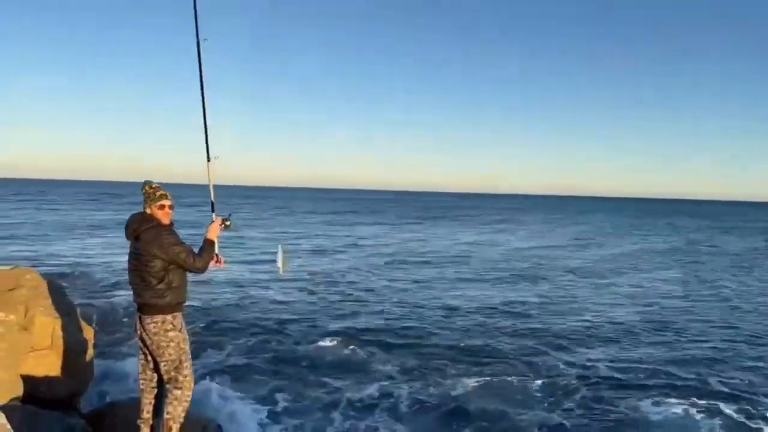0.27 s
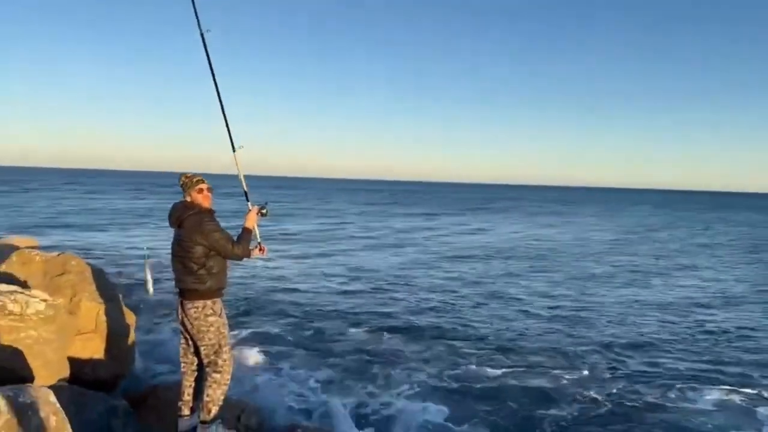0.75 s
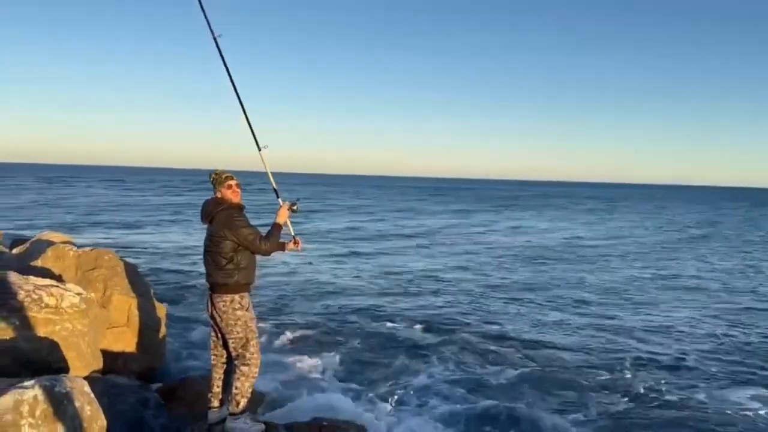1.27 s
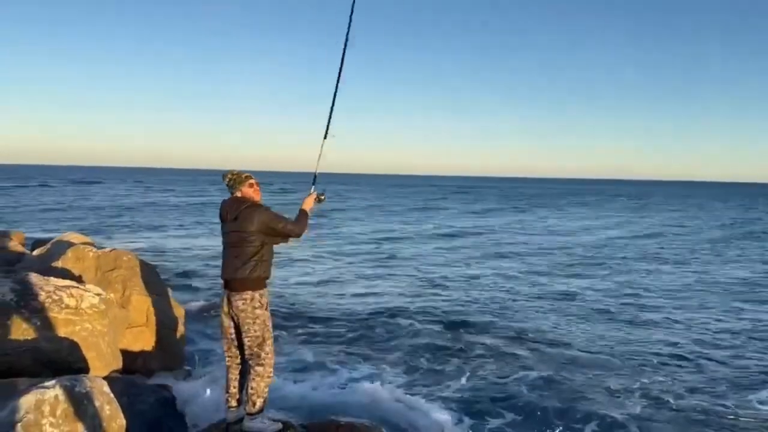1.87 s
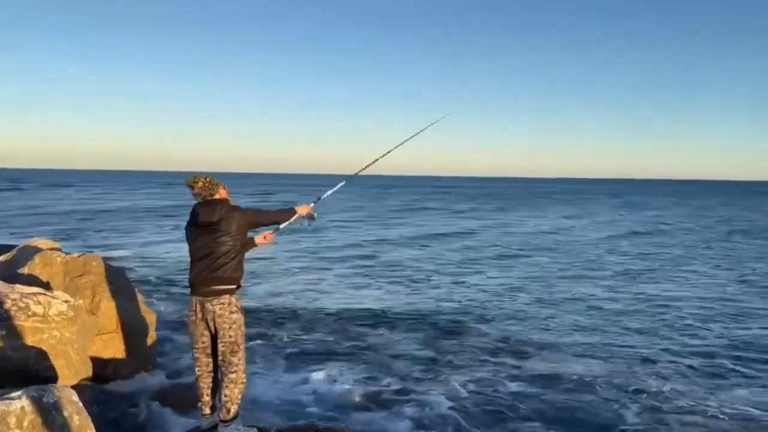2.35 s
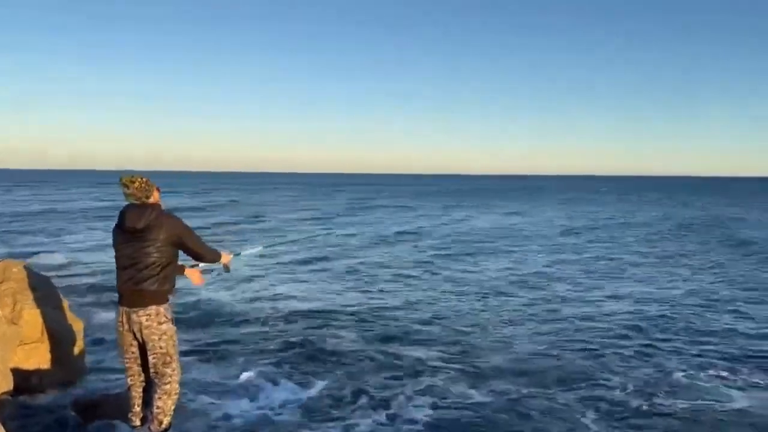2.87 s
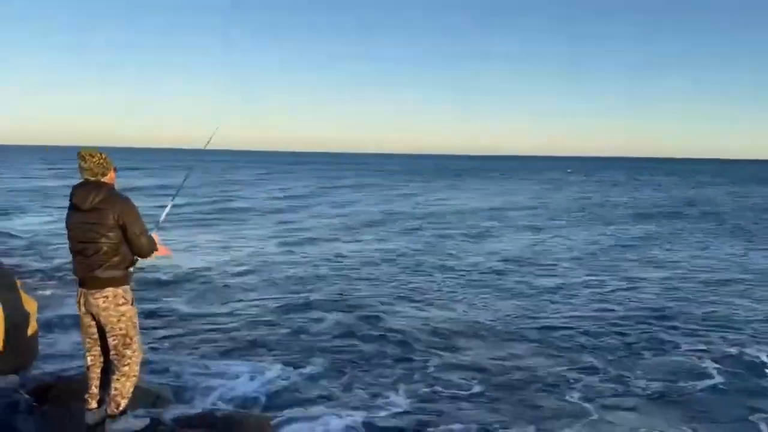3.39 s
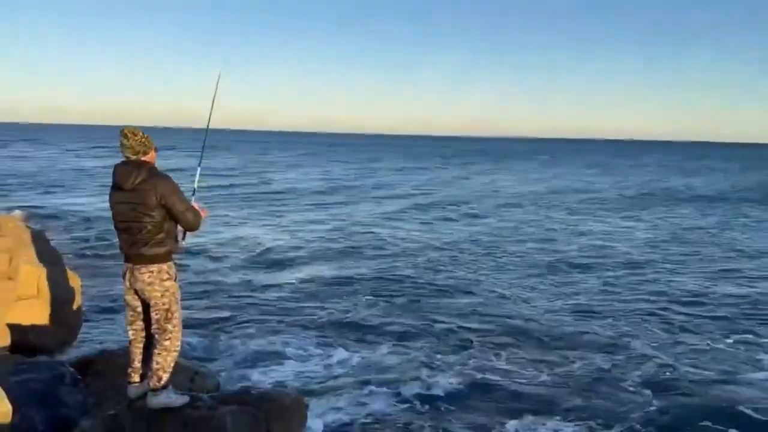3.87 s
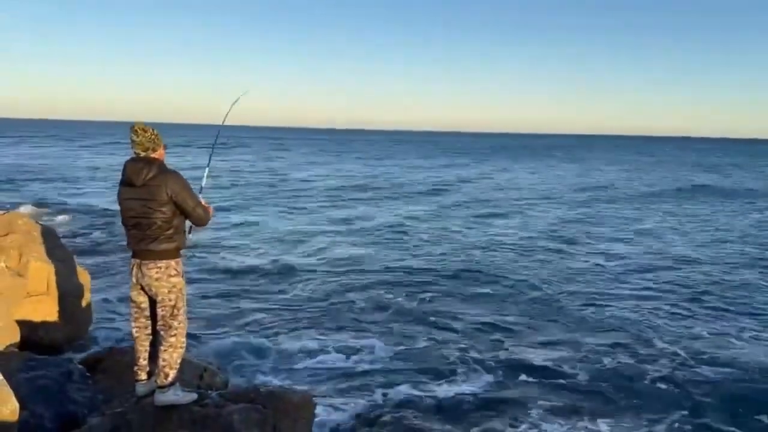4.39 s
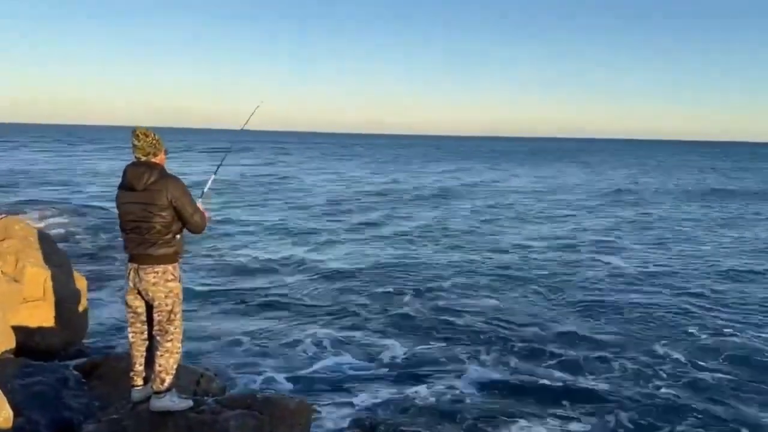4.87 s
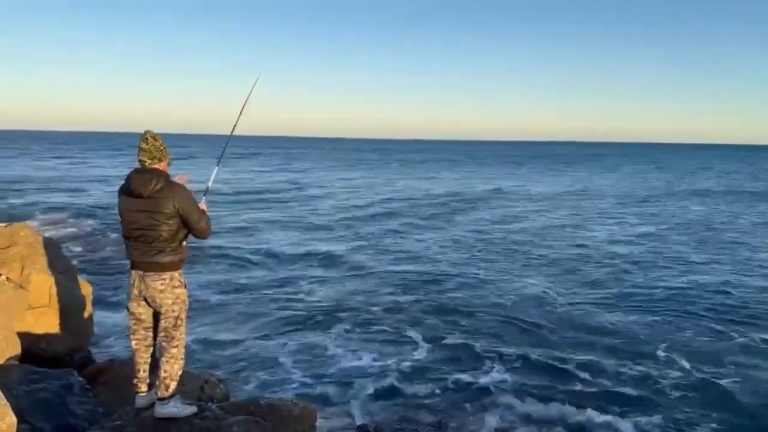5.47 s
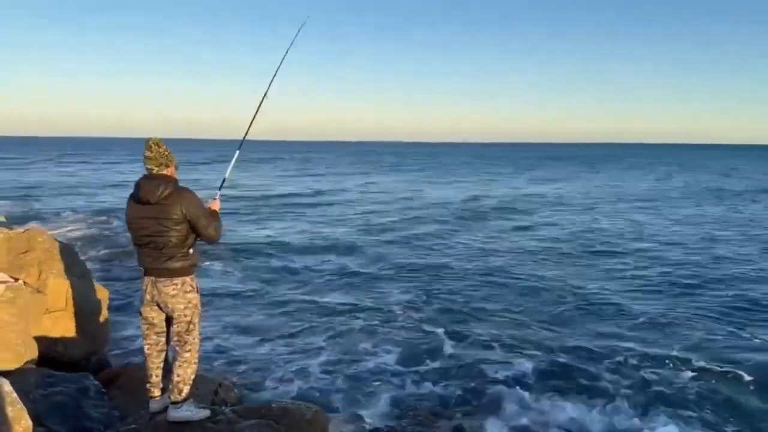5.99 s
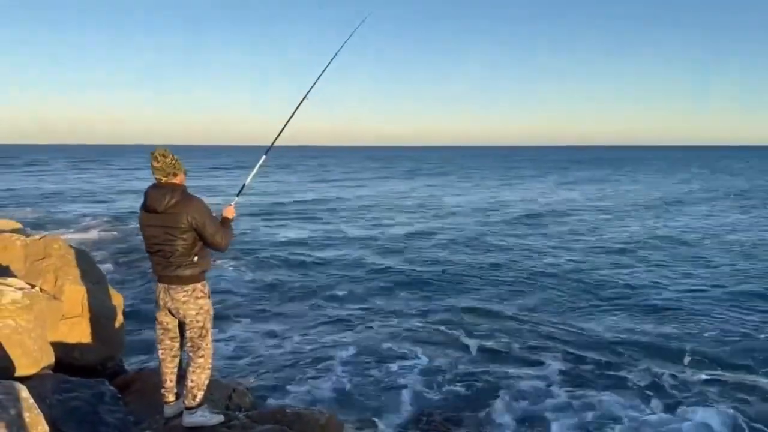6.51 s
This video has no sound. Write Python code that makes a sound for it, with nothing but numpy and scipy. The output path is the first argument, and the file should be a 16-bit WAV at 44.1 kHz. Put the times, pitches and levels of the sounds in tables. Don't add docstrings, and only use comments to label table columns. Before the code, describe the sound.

A wave surges against boulders with a low roar, booms, slaps and bubbly glugs, then drains into softer fizzing wash before a smaller one arrives.

```python
import sys
import numpy as np
from scipy import signal
from scipy.fft import rfft, irfft, next_fast_len
from scipy.io import wavfile
from scipy.ndimage import uniform_filter1d

SR = 44100
rng = np.random.default_rng(int(sys.argv[2]) if len(sys.argv) > 2 else 0)


def store_wav(level_fs):
    pcm = np.round(np.clip(np.atleast_2d(level_fs), -1, 1) * 32767)
    wavfile.write(sys.argv[1], SR, pcm.T.astype(np.int16))


def voltage_ratio(level):
    return 10 ** (np.asarray(level, float) / 20)


N = 297498
PADDED = next_fast_len(N)
HZ = np.maximum(np.fft.rfftfreq(PADDED, 1 / SR), 1)
OCTAVES = np.log2(HZ)
SLOW = np.arange(0, N + 40, 40)
SEAM_HZ = 2600


def rms_one(x):
    return x / np.sqrt(np.mean(x ** 2) + 1e-20)


def in_time(rows):
    s, *columns = np.transpose(rows)
    return [np.interp(SLOW / SR, s, c) for c in columns]


def at_hz(points, hz):
    table_hz, db = np.transpose(points)
    return np.interp(np.log(hz), np.log(table_hz), db)


def smooth(control):
    return np.interp(np.arange(N), SLOW, control)


def drift(rate_hz):
    r = np.exp(-80 * np.pi * rate_hz / SR)
    noise = rng.standard_normal(len(SLOW) + 2000)
    return rms_one(signal.lfilter([1], [1, -2 * r, r * r], noise)[2000:])


def bursts(per_s, spread_db):
    size_db = spread_db * np.minimum(rng.exponential(1, (2, N)), 5)
    sizes = voltage_ratio(size_db) * rng.standard_normal((2, N))
    return rms_one(sizes * (rng.random((2, N)) < per_s / SR))


# (time [s], level [dB])
SWELL = [(0.0, -30.5), (0.17, -32.5), (0.77, -28), (0.98, -31.5), (1.14, -27), (1.18, -25.5), (1.31, -28),
         (1.54, -25), (2.35, -25.5), (2.65, -27.5), (2.74, -25), (2.95, -27.5), (3.15, -26), (4.57, -36.5),
         (6.03, -35), (6.75, -33.5)]
# (time [s], level [dB])
FOAM = [(0.0, -48), (0.58, -46), (2.16, -41), (2.46, -42.5), (3.17, -41), (3.63, -44.5), (3.64, -42.5),
        (3.85, -44), (3.96, -41.5), (4.0, -47.5), (4.7, -46), (4.77, -47.5), (5.25, -46), (5.55, -42),
        (6.25, -42), (6.75, -45.5)]
# (time [s], level [dB])
SPRAY = [(0.0, -52), (0.38, -54.5), (0.43, -48.5), (0.45, -53.5), (0.79, -51.5), (2.05, -47), (2.12, -46.5),
         (2.56, -51), (2.93, -47.5), (3.12, -50.5), (3.15, -48.5), (3.25, -50.5), (3.96, -56),
         (5.47, -49.5), (6.22, -49), (6.75, -54)]
# (mean [dB], share of swell swing, of foam swing, of spray swing, lumpiness [dB])
LAYERS = [
    (-49, -0.12, 0.83, .01, 3),
    (-36, 1.25, 0.19, .01, -0.74),
    (-34.5, 0.62, 0.23, .01, 0.42),
    (-46.5, 0.48, 0.53, 0.076, -0.16),
    (-44, -0.28, 1.17, 0.096, 0.7),
    (-47, 0.094, 0.45, 0.35, -1.33),
    (-50.5, -0.084, 0.081, 1, -0.8),
]


def layer_levels():
    (swell,), (foam,), (spray,) = in_time(SWELL), in_time(FOAM), in_time(SPRAY)
    levels = []
    for db, deep, white, fine, lump_db in LAYERS:
        level = db + deep * (swell - swell.mean()) + white * (foam - foam.mean())
        level = level + fine * (spray - spray.mean())
        levels.append(level + lump_db * drift(2.4))
    return np.array(levels)


# (time [s], left-right bearing [dB], spread [dB])
PLACE = [(0.0, -2, -3.5), (2.07, -5, -5), (2.8, -2.5, -4), (3.08, 0.5, -3.5), (4.47, -4, -2),
         (4.64, -11, -1.5), (4.79, -5, -0.5), (5.54, -10, -7.5), (6.75, -8, -6)]
# (left-right [dB], share of the bearing, spread [dB], share of the spread)
SIDES = [
    (0.97, -0.15, -1.97, 0.17),
    (0.83, 0.9, 0.62, 0.92),
    (0, 0.15, 2.5, 0.33),
]


def layer_places():
    bearing, spread = in_time(PLACE)
    rows = np.array(SIDES)[[0, 0, 0, 1, 1, 2, 2]]
    return rows[:, :1] + rows[:, 1:2] * bearing, rows[:, 2:3] + rows[:, 3:] * spread


LAYER_HZ = [48, 100, 400, 950, 2300, 4400, 9300]
# (frequency [Hz], side over mid [dB])
WIDTH = [(50, 2), (100, -17.5), (190, -10.5), (340, -6.5), (610, 1), (1000, 5.5), (1600, 6.5), (2300, -0.5),
         (2900, 0.5), (4800, -1), (5700, 0.7), (6100, -6.5), (6700, -3), (7300, 1.5), (9500, -3.5),
         (10200, -3.5), (11500, -0.5)]


def white_water(deep, colour_db, low_hz, high_hz, source, surge_db, patch_db, flicker_db, wander_db):
    levels, (pans, wides) = layer_levels(), layer_places()
    shape = voltage_ratio(colour_db) * (HZ > low_hz) * (HZ <= high_hz)
    spectra = rfft(source, PADDED) * shape * [np.ones_like(HZ), voltage_ratio(at_hz(WIDTH, HZ))]
    power = np.mean(voltage_ratio(2 * levels), axis=1, keepdims=True)
    swing = levels - 10 * np.log10(power)
    step = .4 if deep else .15
    out, surge, patch = 0, drift(7.1), drift(12.0)
    for octave in np.arange(np.log2(low_hz), np.log2(high_hz) + step, step):
        window = np.cos(np.pi / 2 * np.clip((OCTAVES - octave) / step, -1, 1)) ** 2
        mid, side = irfft(spectra * window, PADDED)[:, :N]
        share = [np.interp(octave, np.log2(LAYER_HZ), row) for row in np.eye(len(LAYERS))]
        patch = .8 * patch + 0.3 * drift(5.0)
        liveliness_db = surge_db * surge + patch_db * patch + flicker_db * drift(33.0)
        gain = voltage_ratio(share @ swing + liveliness_db)
        wander = voltage_ratio(wander_db * (drift(14.3) + .4 * drift(4.0)) * (octave > 9.3))
        mid = mid * smooth(gain / wander)
        side = side * smooth(gain * wander * voltage_ratio(share @ wides))
        lean = smooth(voltage_ratio(.5 * (share @ pans)))
        out = out + np.array([(mid + side) * lean, (mid - side) / lean])
    target = np.sum(power[:-2] if deep else power[-2:])
    return out / np.sqrt(np.mean(out.mean(axis=0) ** 2) / target)


# (frequency [Hz], level per Hz [dB])
BRIGHT = [(2600, 0), (3140, -3.5), (4170, -2.5), (6190, -5), (6700, -10), (7650, -12), (8200, -7.5),
          (10200, -6.5), (10900, -10), (11300, -13), (11800, -22.5)]


def fizzing_foam():
    return white_water(False, at_hz(BRIGHT, HZ), SEAM_HZ, 11900, bursts(30000., spread_db=-0.5),
                       surge_db=0.3, patch_db=0.18, flicker_db=1.16, wander_db=1.5)


# (frequency [Hz], level per Hz [dB])
DEEP = [(15, -36), (25, -20), (65, -5), (92, -0.5), (192, -3.5), (380, -3.5), (539, -6.5), (876, -14.5),
        (2060, -19), (2600, -22), (3380, -53), (5720, -120)]


def roaring_surf():
    return white_water(True, at_hz(DEEP, HZ), 22.4, SEAM_HZ, bursts(22000., spread_db=1.67),
                       surge_db=0.02, patch_db=0.61, flicker_db=1.0, wander_db=2.0)


def pocket(db, hz, cycles, rise, swell_cycles):
    t = np.arange(int(SR * .3)) / SR
    turns = hz * t
    shape = (1 - np.exp(-turns / swell_cycles)) * np.exp(-np.log(1000) * turns / cycles)
    return voltage_ratio(db) * shape / shape.max() * np.sin(2 * np.pi * turns * (1 + rise * turns / cycles))


def add(out, sound, s, lr_db):
    i = int(s * SR)
    sound = sound * voltage_ratio(np.array([[.5], [-.5]]) * lr_db)
    out[:, i:i + sound.shape[-1]] += sound[..., :N - i]


# (time [s], peak level [dB], pitch [Hz])
THUDS = [(0.196, -29.5, 86), (0.408, -34, 87), (0.551, -28, 60.5), (0.634, -23, 87.6), (0.73, -25, 107),
         (0.836, -21, 158), (0.849, -29, 67), (1.168, -13, 100), (1.209, -18.5, 88.7), (1.622, -26, 81),
         (1.712, -26.5, 85.5), (1.791, -18.5, 92), (1.84, -20.5, 86), (2.06, -15, 175), (2.138, -18, 127),
         (2.156, -21.5, 58.6), (2.198, -14.5, 101), (2.24, -16, 104.7), (2.289, -15.5, 90.6),
         (2.469, -21.5, 84), (2.704, -29, 84), (3.326, -24.5, 86), (3.723, -21.5, 56.5), (3.819, -25, 56),
         (4.062, -32, 92), (4.329, -34, 60), (4.601, -35, 69.6), (4.716, -25, 95), (5.198, -26.5, 103),
         (5.379, -26, 209), (5.442, -34, 51.4), (5.868, -33, 81), (6.04, -32, 145), (6.212, -26.5, 75)]


def cavity_thuds():
    out = np.zeros((2, N))
    for s, db, hz in THUDS:
        thud = pocket(db - 6.5, hz, cycles=24.4, rise=-0.4, swell_cycles=0.51)
        add(out, thud, s, 0.5 + 1.6 * rng.standard_normal())
    return out


# (time [s], peak level [dB], pitch [Hz], left-right [dB])
SLAPS = [(0.713, -20, 960, 2), (1.266, -22, 750, -10), (1.382, -29, 660, 2), (1.671, -19, 677, -1.0),
         (1.759, -16, 586, -8), (1.843, -20, 638, -1.5), (1.912, -14, 848, -5), (1.987, -26, 723, -6),
         (2.318, -32, 717, 0.0), (2.715, -15.5, 637, 3.5), (2.974, -14.5, 1800, -8), (3.207, -31, 732, 2.0),
         (3.52, -21.5, 666, 4), (3.64, -21, 720, 9), (3.732, -22, 650, 5), (3.965, -20, 600, -2),
         (4.754, -22, 590, 3), (5.377, -27, 1200, -19), (5.55, -22, 1310, -9), (5.947, -18, 596, -8)]


def rock_slaps():
    out = np.zeros((2, N))
    for s, db, hz, lr_db in SLAPS:
        add(out, pocket(db - 8.5, hz, cycles=27.0, rise=0.13, swell_cycles=0.21), s, lr_db)
    return out


# (time [s], peak level [dB], pitch [Hz], left-right [dB])
GLUGS = [(0.309, -19, 433, 1), (0.527, -12, 519, -4), (0.613, -40, 288, -21), (1.056, -54, 428, 8),
         (1.1, -14, 377, 4), (1.35, -17, 338, 11), (1.558, -9, 235, -1), (1.585, -11, 311, 1),
         (1.63, -11, 378, 3), (1.911, -12.5, 308, -1), (2.132, -13.5, 397, -2), (2.205, -25, 380, 11),
         (2.3, -9, 368, 1), (2.38, -10.5, 540, -1), (2.515, -11.5, 298, -2), (2.592, -35, 233, 1.5),
         (2.653, -14.5, 320, 1.0), (2.804, -4.5, 430, 5), (2.847, -21, 366, 10), (2.989, -39, 603, -5),
         (3.228, -9.5, 277, 6.5), (3.524, -14.5, 281, 11), (3.597, -17.5, 346, 3), (3.706, -11, 203, 9),
         (3.824, -15, 292, 2), (4.315, -18, 318, -1), (4.752, -22, 563, -8), (6.309, -21, 271, -9)]


def bubble_glugs():
    out = np.zeros((2, N))
    for s, db, hz, lr_db in GLUGS:
        add(out, pocket(db - 14.5, hz, cycles=46.0, rise=0.22, swell_cycles=0.38), s, lr_db)
    return out


def scene():
    water = voltage_ratio(1.15) * fizzing_foam() + voltage_ratio(-0.17) * roaring_surf()
    return water + cavity_thuds() + rock_slaps() + bubble_glugs()


# (frequency [Hz], width [Hz], depth [dB])
PORT_DIPS = [(5215, 170, -3.5), (7440, 250, -3), (7000, 600, -1), (3050, 300, -1.5)]


def microphone_ports(dry):
    dips_db = sum(db / (1 + (2 * (HZ - hz) / width) ** 4) for hz, width, db in PORT_DIPS)
    return irfft(rfft(dry, PADDED) * voltage_ratio(dips_db), PADDED)[:, :N]


# (frequency [Hz], surroundings over step [dB])
FINENESS = [(170, 12), (500, 12), (850, 3), (1600, 2), (2200, 3), (2700, -4.5), (3300, -4.5), (3700, -1.5),
            (4500, -1.5), (5100, -4.5), (6400, -3.5), (7400, -6), (8000, -1), (8600, 1), (9600, 0),
            (10600, -2), (11500, -6)]
# (0 mid or 1 side, top [Hz], width per unit of need [Hz], mean need)
STARVED = [(0, 7580, 350, -.4), (0, 8100, 500, -1.1), (0, 6900, 250, -.4), (0, 5400, 200, -1.1),
           (0, 3200, 250, -1.6), (0, 1080, 120, -1.2), (0, 1850, 170, -1.1), (1, 6850, 500, .3),
           (1, 6300, 400, 0), (1, 7550, 200, .6), (1, 5300, 150, -.5), (1, 3100, 300, -1)]
# (time [s], length [s], centre [Hz], width [Hz])
GAPS = [(.12, .09, 7370, 500), (.51, .24, 7300, 500), (.83, .06, 3400, 750), (.89, .05, 2850, 300),
        (1.29, .13, 2890, 250), (1.38, .13, 7600, 300), (1.49, .03, 7800, 800), (1.89, .13, 7390, 200),
        (2.04, .09, 7280, 500), (2.19, .2, 7280, 400), (2.47, .16, 7430, 600), (2.66, .1, 7300, 500),
        (2.83, .21, 7300, 650), (2.88, .02, 7900, 700), (3.02, .12, 5050, 250), (3.07, .05, 4900, 500),
        (3.09, .09, 7420, 330), (3.23, .08, 7350, 300), (3.26, .1, 5250, 200), (3.37, .13, 7400, 350),
        (3.48, .04, 5300, 300), (3.55, .12, 7310, 1050), (3.74, .11, 7410, 250), (3.94, .08, 7110, 600),
        (4.09, .05, 5370, 330), (4.16, .41, 7160, 750), (4.28, .12, 6700, 500), (4.48, .05, 5340, 260),
        (4.6, .06, 1050, 90), (4.62, .14, 7220, 650), (4.66, .07, 3140, 400), (4.69, .07, 880, 110),
        (4.72, .03, 3450, 250), (4.75, .03, 3750, 250), (4.78, .04, 1060, 90), (4.83, .23, 7280, 750),
        (4.86, .05, 3300, 200), (4.87, .05, 960, 90), (5.11, .07, 5430, 330), (5.23, .06, 5410, 330),
        (5.38, .03, 5420, 330), (5.46, .11, 7240, 450), (5.69, .39, 7140, 700), (6.14, .25, 7180, 800),
        (6.35, .18, 3300, 170), (6.46, .29, 7270, 700)]
# (mid limit [Hz], side limit [Hz], share of time)
TOP_EDGES = [(11050, 10350, .3), (11400, 10350, .2), (11760, 10350, .13), (11760, 11050, .29),
             (11760, 11700, .08)]


def thinned(left, right):
    hop, grid, lines = 1024, 89, 560
    rise = np.cumsum(np.kaiser(hop + 1, 4 * np.pi))
    window = np.sqrt(np.concatenate([rise[:-1], rise[-2::-1]]) / rise[-1])
    turns = np.outer(np.arange(2 * hop) + .5 + hop / 2, np.arange(lines) + .5)
    basis = window[:, None] * np.cos(np.pi / hop * turns) * np.sqrt(2 / hop)
    count = N // hop + 3
    mid_side = np.array([left + right, left - right]) / 2
    blocks = np.pad(mid_side, ((0, 0), (2 * hop - grid, count * hop - N - hop + grid)))
    blocks = blocks.reshape(2, -1, hop)
    cells = (np.concatenate([blocks[:, :-1], blocks[:, 1:]], axis=2) @ basis).transpose(0, 2, 1)
    hz = ((np.arange(lines) + .5) * SR / 2 / hop)[:, None]
    s = (np.arange(count) * hop + grid - hop) / SR

    around = uniform_filter1d(uniform_filter1d(cells ** 2, size=40, axis=1), size=5, axis=2)
    around = around.mean(axis=0)
    uneven = uniform_filter1d(rng.normal(0, 1.4, (2, lines // 10, count)), size=2, axis=2)
    uneven_db = 4.3 * np.repeat(uneven, 10, axis=1)
    step = np.sqrt(around + 1e-20) * voltage_ratio(uneven_db - at_hz(FINENESS, hz))
    cells = np.sign(cells) * step * np.floor(abs(cells / step) ** .75 + .4) ** (4 / 3)

    kept = np.ones(cells.shape, bool)
    swell = np.interp(s, *np.transpose(SWELL))
    for channel, top_hz, width_hz, need in STARVED:
        need = need - .06 * (swell - swell.mean())
        need = need + np.repeat(rng.standard_normal(count), 2)[:count]
        kept[channel] &= (hz > top_hz) | (hz < top_hz - width_hz * np.clip(need, 0, 2))
    for start, length, gap_hz, width in GAPS:
        outside = (s < start - .012) | (s > start + length + .012)
        kept[0] &= (abs(hz - gap_hz) > width / 2) | outside
    edges = np.array(TOP_EDGES)
    steps = rng.choice(len(edges), count, p=edges[:, 2])
    steps = np.where(rng.random(count) < .5, steps, np.roll(steps, 1))
    kept &= hz < edges[steps, :2].T[:, None, :]

    frames = (cells * kept).transpose(0, 2, 1) @ basis.T
    joined = (frames[:, 1:, :hop] + frames[:, :-1, hop:]).reshape(2, -1)
    mid, side = joined[:, hop - grid:hop - grid + N]
    return np.array([mid + side, mid - side])


def roll_off(x):
    return signal.sosfilt(signal.butter(12, 11830, fs=SR, output="sos"), x)


def record(dry):
    heard = thinned(*microphone_ports(dry))
    return roll_off(heard)


dry = scene()
out = record(dry)
store_wav(out)
```